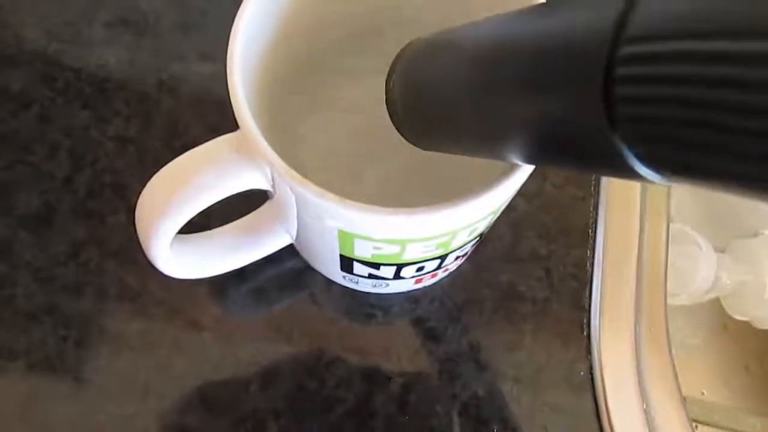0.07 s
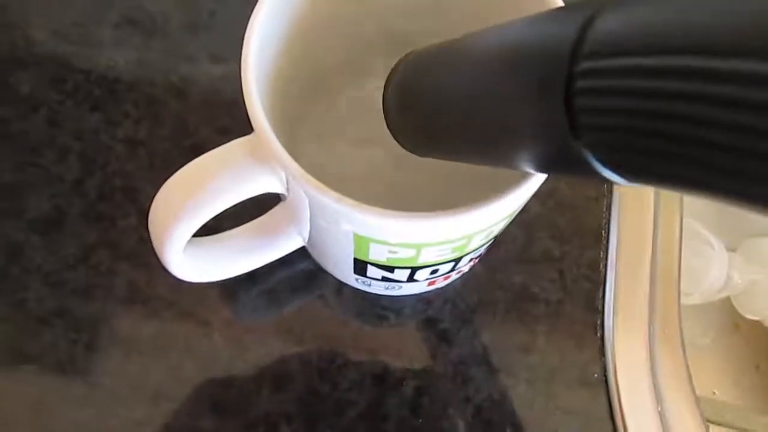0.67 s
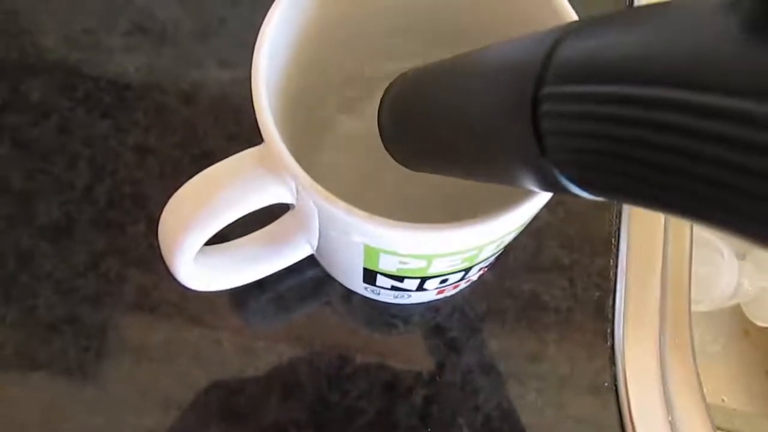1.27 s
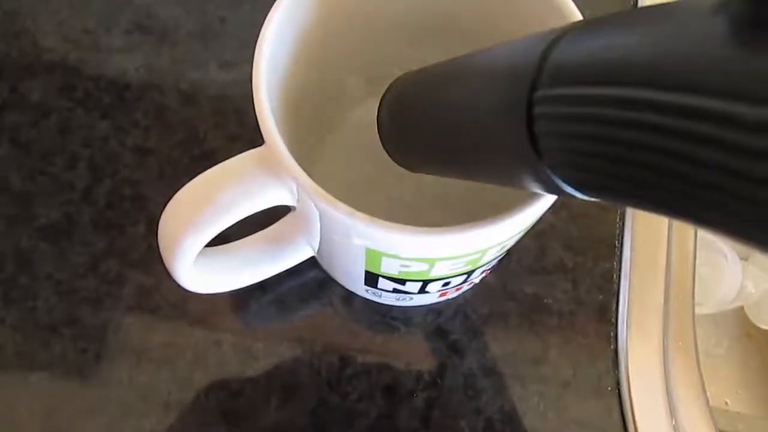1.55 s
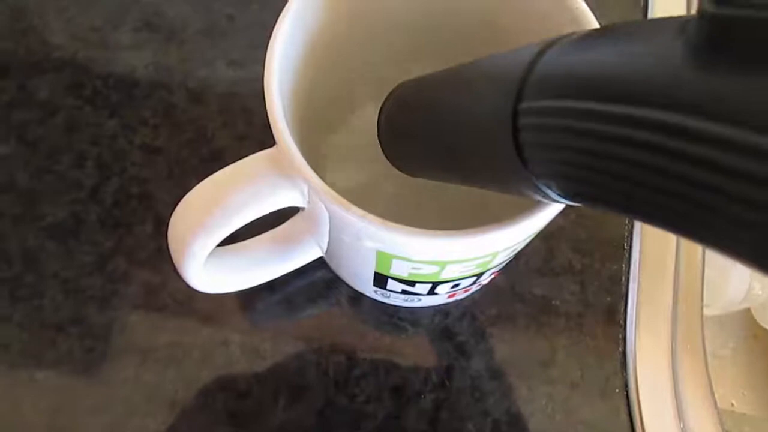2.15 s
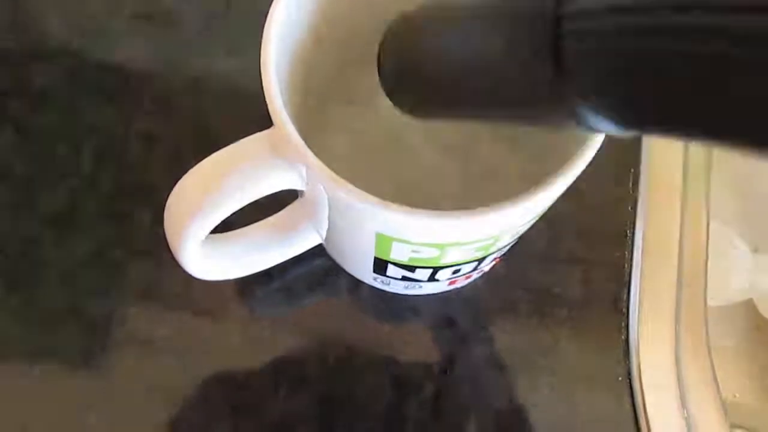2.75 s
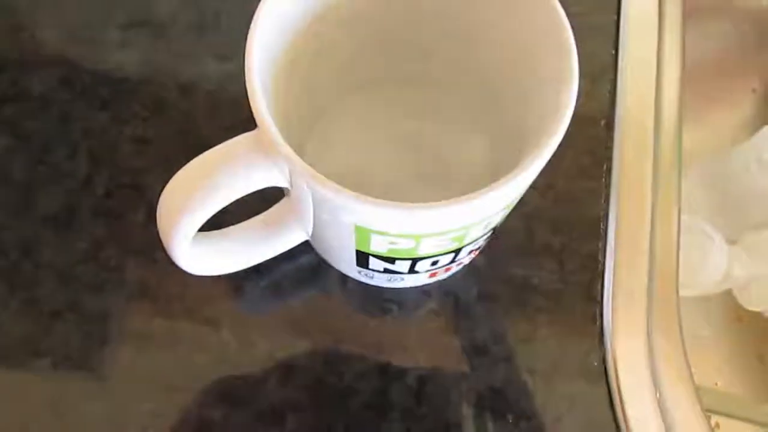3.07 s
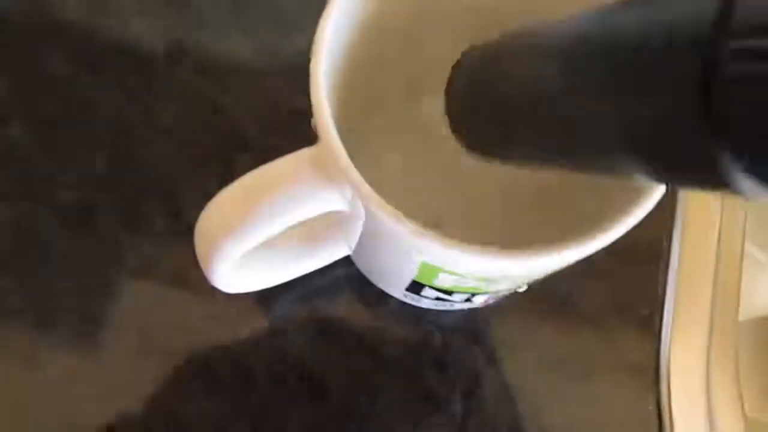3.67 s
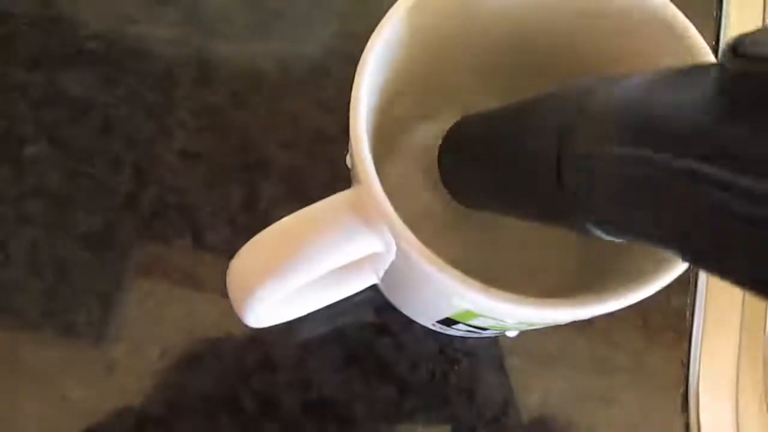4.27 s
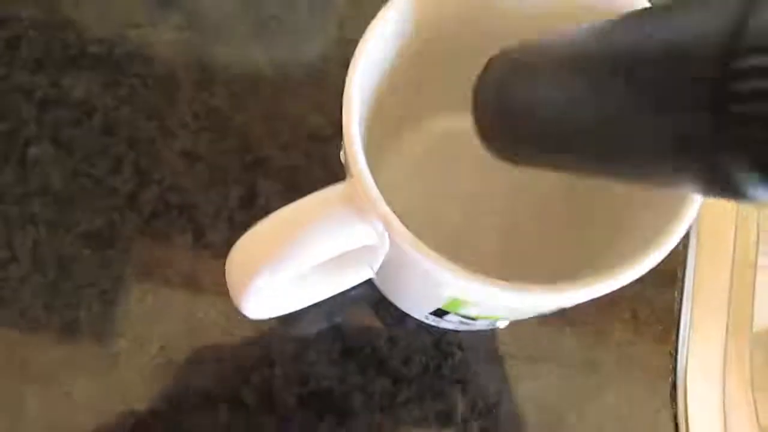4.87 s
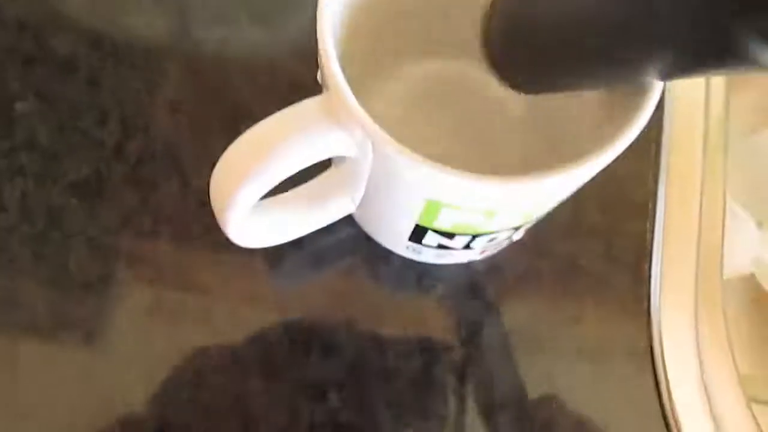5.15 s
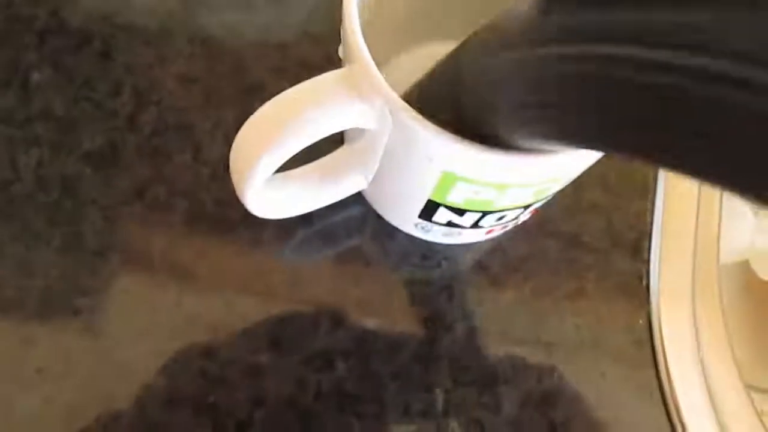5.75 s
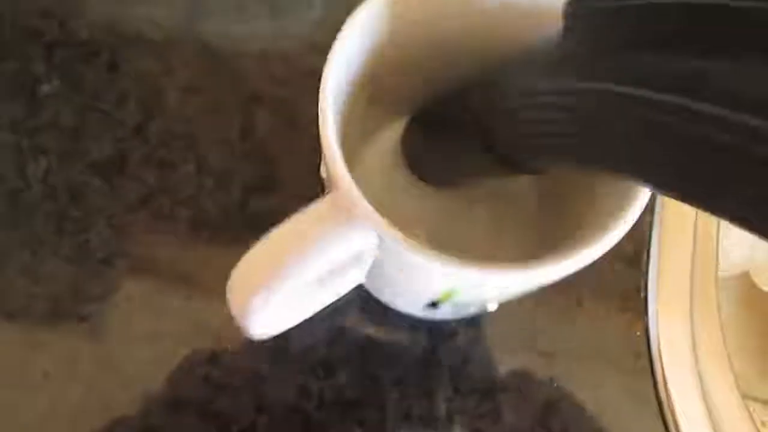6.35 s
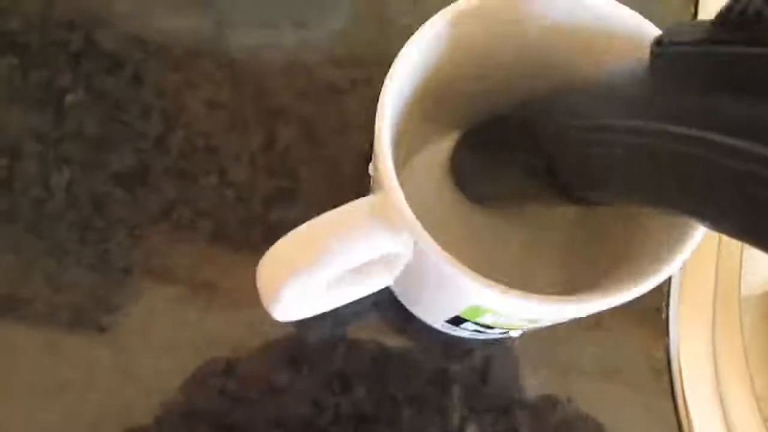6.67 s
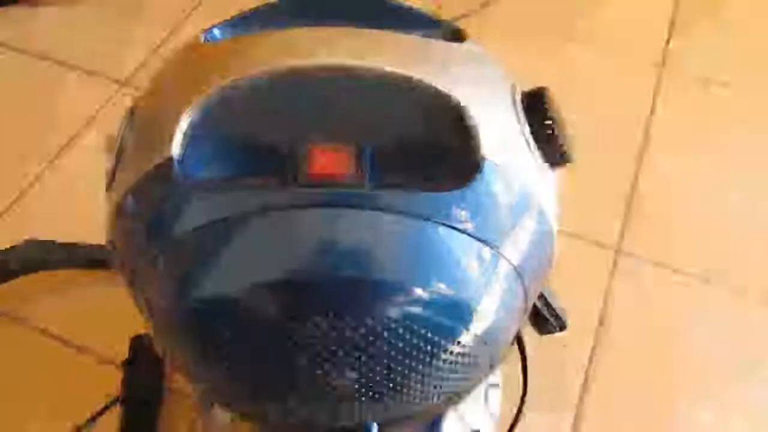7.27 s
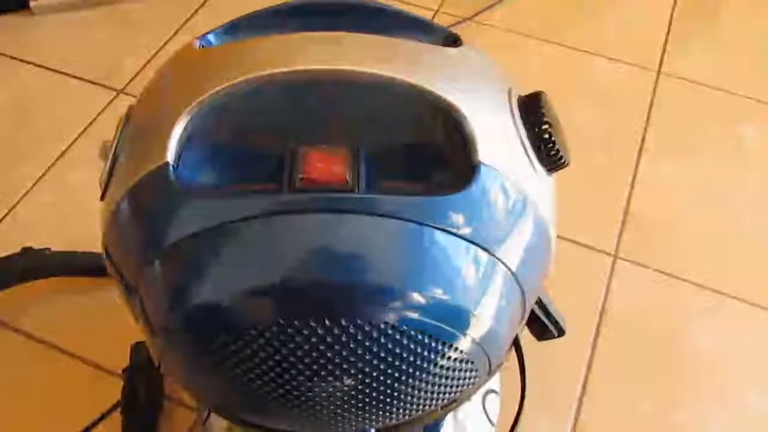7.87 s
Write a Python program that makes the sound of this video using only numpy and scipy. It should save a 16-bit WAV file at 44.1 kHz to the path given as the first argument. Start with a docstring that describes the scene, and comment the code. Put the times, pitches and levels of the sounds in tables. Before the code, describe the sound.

Heard up close in a kitchen, a vacuum nozzle sucks air from a china mug with a bright hiss over an even motor note. A hollow howl sinks in pitch and comes and goes, with brief thin whistles at the rim. The suction grows louder and slurps, then seals: the rush drops and the motor races. With a last spit of air the cleaner cuts off into quiet room tone.

```python
"""Vacuum cleaner in a china mug.

Close up, on a kitchen counter. The rotor gives one clean note; air roars in the hose, hisses at the
moving nozzle, whistles past the rim and blows the mug's air column into a throbbing howl.
Near the end the nozzle chokes and the motor races. The noise stops dead; a quiet room hums on."""
import sys
import numpy as np
from scipy import signal
from scipy.io import wavfile
from scipy.ndimage import uniform_filter1d

SR = 44100
rng = np.random.default_rng(int(sys.argv[2]) if len(sys.argv) > 2 else 0)


def generate_wav(sig):
    """Save sig (samples, or channels by samples) to the path in sys.argv[1] as 16-bit PCM at SR."""
    pcm = np.round(np.clip(np.atleast_2d(sig).T, -1, 1) * 32767).astype(np.int16)
    wavfile.write(sys.argv[1], SR, pcm)


N = 348831
HOP = 256
TIME_S = np.arange(N) / SR
FRAME_S = np.arange(N // HOP + 5) * HOP / SR
BIN_HZ = np.fft.rfftfreq(4 * HOP, 1 / SR)
SLURP_S, CHOKE_S, CHOKE_CLOSE_S, STOP_S = 5.99, 6.8, 0.078, 7.301
MUG_SINK_S = 1.03  # time constant of the mug's falling resonances

# left-right coherence of direct and diffuse sound: f/Hz, coherence/1
DIRECT_COHERENCE = [(60, 1), (340, 1), (1100, 1), (2200, 0.99), (3200, 0.8), (5000, 1), (6400, 0.56),
                    (8000, 0.61), (10500, 1)]
DIFFUSE_COHERENCE = [(60, 1), (340, 1), (1000, 0.91), (1900, 0.061), (3300, 0.1), (10500, 0.11)]
# left channel's phase lead at unit offset: f/Hz, lead/rad
LEFT_LEAD = [(100, 0.25), (5000, -0.16), (6300, -.3), (7500, -0.17), (8500, -0.92), (10500, -0.7)]
# room air spectrum and hum tones: f/Hz, level/dB
ROOM_AIR = [(20, -25.5), (40, -16.5), (90, -9), (140, -4.5), (280, -9), (340, -8), (600, -12), (1100, -9.5),
            (2000, -20), (3400, -24.5), (4400, -29.5), (6200, -24), (8500, -31), (10800, -44)]
ROOM_HUM = [(50, -71), (100, -77), (153, -66), (200, -66), (256, -69), (288, -73), (697, -73), (742, -74),
            (1039, -74), (1137, -72)]
# rush after the stop: f/Hz, level/dB
TAIL_SPECTRUM = [(600, -27), (850, -9), (1130, -2.5), (1600, -9), (2400, -8), (3600, -6), (4400, -28),
                 (4900, -14), (5700, -8), (7500, -19), (10500, -25)]
# modes ringing after the stop: f/Hz, level/dB, t60/s
TAIL_MODES = [(1135, -57, 0.33), (4060, -55, 0.5)]
# uneven low rumble, opposite in left and right: f/Hz, level/dB
ANTIPHASE_SPECTRUM = [(45, -39.5), (90, -9.5), (190, -1.5), (300, 1.5), (430, -3), (600, -11.5), (900, -30)]
# hose roar and rumble: f/Hz, level/dB
ROAR_SPECTRUM = [(100, -53), (200, -22), (260, -19.5), (315, -0.5), (400, -5.2), (470, -5), (560, 2.5),
                 (650, 3), (790, 4.2), (1000, -2), (1300, -4.5), (1650, -7.5), (2200, -28)]
RUMBLE_SPECTRUM = [(15, -50.5), (40, -26.5), (60, -11), (80, 0), (125, 0), (160, -3), (200, 1), (240, -9),
                   (320, 4), (600, -38)]
# air in hose and body: t/s, roar/dB, rumble/dB
HOSE_FLOW = [(0, -38.5, -44), (.8, -37, -43.5), (2.5, -33, -43), (3.0, -35, -42.5), (3.7, -28.8, -39),
             (4.6, -33, -43.5), (5.2, -29.2, -41), (5.5, -31.5, -46.5), (6.75, -29.3, -60)]
# slurping flutter: f/Hz, depth/dB
SLURP_DEPTH = [(200, 4.5), (900, 4), (1900, 6), (2600, 2.5), (4500, 1), (6000, 0)]
# rotor speed: t/s, f/Hz
MOTOR_SPEED = [(0, 525.6), (.5, 528.5), (1.5, 532.3), (2.65, 531.2), (3.1, 528), (4.15, 523.6),
               (4.6, 531.7), (5.1, 530.6), (5.5, 531.2), (6.8, 534), (6.89, 537), (7.0, 543.6), (7.3, 566)]
# motor note: t/s, level/dB, left minus right/dB
MOTOR_NOTE = [(0, -32.5, 4.5), (.5, -35, -13), (.68, -31, -8.5), (1.25, -26, -4.5), (2.65, -25, -4.5),
              (3.08, -31.5, -12), (3.3, -28.5, 4.5), (4.0, -27, 2.5), (4.4, -31, -3), (4.93, -25, -7),
              (5.07, -34, -19), (5.4, -31.5, 2.5), (5.85, -32, -13), (6.735, -33, -4), (6.764, -27.5, -3),
              (6.8, -35, -2), (6.87, -26.5, -2.5), (7.015, -26.5, -4), (7.052, -40, -1.5),
              (7.082, -32, -1.5), (7.115, -38, -2.5), (7.172, -28, -4), (7.215, -34, -1.5),
              (7.28, -29, -2.5)]
# nozzle catches briefly: t/s, rotor speed rise/Hz
CATCHES = [(4.42, 8.4), (5.21, 4.8), (5.7, 7), (6.06, 3), (6.45, 4.6), (6.59, 3)]
# nozzle: t/s, place (0 lifted, 1 in mug, 2 at wall, 3 choked), direct share/1, offset from centre/1
NOZZLE_PATH = [(0, .5, 1, 0.33), (2.6, 1, 0.99, 0.75), (2.7, 3, 0.84, .4), (3.05, -0.5, 0.27, 0.11),
               (3.5, 2.04, .63, .5), (3.95, 0.76, 0.56, 1.4), (4.1, 2.5, 1, 2.4), (4.52, 1.56, 0.98, 2),
               (4.72, 3, 0.7, 1.3), (5.29, 0.24, 0.76, .8), (5.33, 2.5, 1, 1.9), (6.1, 2, 1, 1.2),
               (6.8, 1.85, 0.84, 2.1)]
# hollow dip near 2 kHz: t/s, f/Hz, gain/dB, half width/Hz
HOLLOW_DIP = [(0, 2400, -15, 110), (2.7, 2350, -15, 100), (3.1, 2400, -1.5, 100), (3.4, 2400, -6, 110),
              (3.52, 2390, -19, 140), (3.75, 2320, -16, 190), (4.0, 2320, -11, 170), (4.2, 2170, -7, 160),
              (4.45, 2080, -6, 170), (4.7, 2150, -1, 100), (5.97, 1960, 1.5, 100), (6.04, 1920, -17, 130),
              (6.5, 1880, -17, 170), (6.7, 1780, -15, 220), (6.8, 1600, -22, 280), (6.86, 1620, -10, 220),
              (6.9, 2000, -9, 70)]
# jet blowing across the mug: start/s, end/s, level/dB, time per 6 dB fall outside/s
HOWLS = [(.3, 1.2, -23.4, 0.3), (1.5, 2.72, -22, 0.24), (3.2, 3.38, -27, .05), (3.54, 3.86, -18, .06),
         (3.97, 4.25, -19.8, .16), (5.46, 5.5, -19.5, 0.02), (5.701, 6.66, -26, 0.6)]
# weighting of the howl: f/Hz, gain/dB
HOWL_COLOUR = [(400, -20), (780, -11), (900, 6), (1700, 0.5), (2000, -11), (3000, -25.5)]
# howl modulation: t/s, depth/1
THROB_DEPTH = [(1.3, .15), (1.9, .32), (3.5, .36), (4.4, .42), (4.7, .2)]
# upper mug resonance and bore whistle: t/s, added gain/1
UPPER_MODE = [(0, 0.5), (.6, 1.15), (1.1, .85), (1.6, 1), (2.5, .85), (2.75, 0), (4.25, 0.36), (4.6, 0)]
BORE_WHISTLE = [(0, 0.67), (2.6, 0.34), (2.9, 1.1), (3.6, 0.99), (4.3, .7), (4.9, 1.1), (5.25, .8),
                (5.35, 0)]
# nozzle-rim gap, lower as it opens: t/s, f/Hz, strength/1
RIM_GAP = [(2.56, 6540, 0), (2.67, 6470, 1.15), (2.76, 5900, 0), (2.85, 5540, 0.31), (3.05, 4900, 0.45),
           (3.3, 4870, 0.65), (3.57, 4960, 0.18), (3.71, 5130, 1), (3.84, 5350, 0.5), (3.94, 6400, 0.25),
           (4.15, 6507, .2), (4.5, 6640, 0.24), (4.74, 6400, 0.2), (4.84, 5770, 0.7), (4.92, 5000, 0.42),
           (5.06, 4970, .7), (5.22, 4895, .6), (5.32, 4900, 0.078)]
# gap's spectral ripple at unit strength: f/Hz, depth/dB
GAP_RIPPLE = [(2600, 0), (4000, 4.2), (7000, 3.1), (10500, 1.6)]
# air splitting on the rim: t/s, f/Hz, added gain/1
EDGE_TONES = [(3.51, 5100, .8), (3.6, 3900, .8), (3.71, 5060, .6), (3.72, 8750, .7), (4.84, 5750, .7),
              (4.94, 5050, .6), (5.05, 4890, 2), (5.21, 4890, .7), (5.38, 7600, .6), (5.41, 2250, .7)]
# hiss at each nozzle place: f/Hz, level/dB
HISS_LIFTED = [(760, -37), (1250, -3.5), (1520, 2.5), (1780, 1.5), (2010, -5.5), (2150, -5), (2450, -6),
               (2750, -4.5), (3180, -3.5), (3700, -6.5), (5000, -6.5), (5660, -1.5), (6400, -3),
               (7710, -3.5), (8500, -4.5), (10800, -12.5)]
HISS_IN_MUG = [(760, -27.5), (1300, -4), (1570, 0), (1850, -7), (2000, -8), (2150, -5.5), (2350, -12),
               (2660, -3), (3400, -3), (4400, -5.5), (5500, -5), (6400, -3), (7700, -5.5), (8300, -5),
               (10800, -14)]
HISS_AT_WALL = [(760, -46), (1300, -7.5), (1610, -6.5), (1920, -14), (2100, -6.5), (2330, -5), (2990, -3),
                (3380, -0.5), (4450, -6.5), (4780, -1.5), (5220, -3.5), (5970, -1), (9210, -8),
                (10800, -15)]
HISS_CHOKED = [(760, -48), (1300, -20), (1540, -2.5), (1730, -4), (2000, -15), (2170, -8), (2470, -15),
               (2950, -6), (3400, -8), (4100, -13), (4600, -6.5), (5100, -11.5), (6700, -8.5),
               (9130, -13.5), (10800, -20)]
# nozzle jet: t/s, level/dB, target share of top treble/dB
JET = [(0, -18.5, -5.5), (.7, -16.5, -4.5), (1.1, -18.5, -5), (2.6, -18, -4.7), (3.05, -22, -4),
       (3.55, -16, -5), (3.92, -18, -2.5), (4.2, -14, -10), (4.5, -16.5, -5.5), (4.75, -20, -6),
       (5.3, -18.5, -5), (5.32, -15.8, -4), (5.9, -15, -5), (5.98, -11, 0.2), (6.8, -12, -4)]
# shelf that sets the jet's brightness: f/Hz, weight/1
TREBLE_SHELF = [(5500, 0), (8500, 0.98)]
# nozzle meets the wall or its seal slips: t/s, boost/dB, extra treble/dB
SPITS = [(.19, 1.5, 1.5), (.34, 1.5, 0), (.59, 2.5, 1), (.76, 2.5, 0), (2.32, 2, -1), (4.21, 1.5, 0),
         (5.07, 2, 0), (5.333, 2, 1.5), (5.41, 2, -2), (7.28, 9, 9)]


def gain_of(db):
    """Decibels to amplitude."""
    return 10 ** (np.asarray(db) / 20)


def unit_rms(x):
    """Scale to rms 1."""
    return x / np.sqrt(np.mean(x ** 2) + 1e-20)


def ramp(t, start_s, length_s):
    """Linear rise, 0 to 1."""
    return np.clip((t - start_s) / length_s, 0, 1)


def bump(x, centre, half_width):
    """Gaussian of height 1."""
    return np.exp(-((x - centre) / half_width) ** 2)


def follow(rows, t):
    """Table columns at times t."""
    times_s, *columns = np.transpose(rows)
    return [np.interp(t, times_s, column) for column in columns]


def per_bin(points):
    """Table value per bin, interpolated in log frequency."""
    hz, value = np.transpose(points)
    return np.interp(np.log(BIN_HZ + 1), np.log(hz + 1), value)


def band_gain(shape, band_hz):
    """In-band amplitude per frame."""
    inside = (BIN_HZ >= band_hz[0]) & (BIN_HZ <= band_hz[1])
    return np.sqrt(np.sum(shape ** 2 * inside, -1, keepdims=True) + 1e-20)


def peak(centre_hz, half_hz):
    """Resonance of height 1, steady or moving."""
    return 1 / (1 + ((BIN_HZ - np.reshape(centre_hz, (-1, 1))) / np.reshape(half_hz, (-1, 1))) ** 2)


def waver(t, top_hz):
    """Random drift, rms 1, over the decade below top_hz."""
    rates_hz = np.geomspace(top_hz / 10, top_hz, num=30) * rng.uniform(.9, 1.1, size=30)
    return unit_rms(sum(np.sin(2 * np.pi * (hz * t + rng.random())) for hz in rates_hz))


def patches(white, frames, bins):
    """White noise smoothed into time-frequency patches, rms 1."""
    return unit_rms(uniform_filter1d(uniform_filter1d(white, frames, axis=0), bins, axis=1))


def air_noise(shape, direct, eddy_db, offset=0):
    """Shaped stereo noise stirred by eddies; diffuse sound is less coherent than direct."""
    a, b, c, d, white = rng.standard_normal((5, len(FRAME_S), len(BIN_HZ)))
    eddies = gain_of(eddy_db * patches(white, frames=13, bins=10))
    direct = np.clip(np.reshape(direct, (-1, 1)), 0, 1)
    coherence = direct * per_bin(DIRECT_COHERENCE) + (1 - direct) * per_bin(DIFFUSE_COHERENCE)
    coherence = np.clip(coherence, 0, 1)
    lead_rad = np.reshape(offset, (-1, 1)) * per_bin(LEFT_LEAD)
    left = a + 1j * b
    right = (coherence * left + np.sqrt(1 - coherence ** 2) * (c + 1j * d)) * np.exp(-1j * lead_rad)
    mono_gain = np.sqrt(1 + coherence * np.cos(lead_rad) + 1e-3)
    spectra = np.array([left, right]) * shape * eddies / mono_gain
    return signal.istft(spectra.swapaxes(1, 2), nperseg=4 * HOP, noverlap=3 * HOP)[1][:, :N]


def choked(t):
    """Nozzle seal, 0 open to 1 shut."""
    return ramp(t, CHOKE_S, CHOKE_CLOSE_S)


def nozzle_state(sealed_direct=.08, sealed_offset=4.1):
    """Place, direct share, offset; once sealed, mostly room sound is left."""
    sealed = (3, sealed_direct, sealed_offset)
    blend = ramp(FRAME_S, CHOKE_S + CHOKE_CLOSE_S / 2, CHOKE_CLOSE_S / 2) ** 2
    return [free + (end - free) * blend for free, end in zip(follow(NOZZLE_PATH, FRAME_S), sealed)]


def room(air_db=-59):
    """Kitchen air, mains hum and faint wavering tones, slightly out of phase left to right."""
    air = gain_of(air_db) * unit_rms(air_noise(gain_of(per_bin(ROOM_AIR)), direct=0, eddy_db=1.5))
    channel_turns = np.array([[0], [.13]])
    hum = 0
    for hz, db in ROOM_HUM:
        turns = hz * TIME_S + rng.random() + .1 * waver(TIME_S, top_hz=9)
        hum += gain_of(db) * np.sqrt(2) * np.sin(2 * np.pi * (turns + channel_turns))
    return air + hum


def stop_tail(rush_db=-47, rush_t60_s=.35):
    """A faint rush and two thin, unsteady rings fade after the stop."""
    age_s = np.maximum(TIME_S - STOP_S, 0)
    decay_s = np.maximum(age_s - .055, 0)
    rush = unit_rms(air_noise(gain_of(per_bin(TAIL_SPECTRUM)), direct=0.23, eddy_db=2.5))
    rush *= gain_of(rush_db - 60 * decay_s / rush_t60_s)
    rings = 0
    for hz, db, t60_s in TAIL_MODES:
        turns = hz * age_s + .19 * waver(TIME_S, top_hz=110)
        rings += gain_of(db - 60 * decay_s / t60_s) * np.sin(2 * np.pi * turns)
    return rush * ramp(age_s, 0, length_s=.019) + rings * ramp(age_s, .018, length_s=.021)


def antiphase_rumble(level_db=-41.5):
    """Uneven low rumble, opposite in left and right, from about 6 to 6.8 s."""
    rumble = unit_rms(air_noise(gain_of(per_bin(ANTIPHASE_SPECTRUM)), direct=1, eddy_db=5.5)[0])
    level = gain_of(level_db) * ramp(TIME_S, SLURP_S, length_s=.25) * (1 - choked(TIME_S))
    return np.array([rumble, -rumble]) * level


def slurp():
    """Gain per frame and bin: against the mug's bottom, air comes in uneven gulps."""
    gulps = patches(rng.standard_normal((len(FRAME_S), len(BIN_HZ))), frames=7, bins=5)
    sucking = ramp(FRAME_S, SLURP_S, length_s=.03) * (1 - choked(FRAME_S))
    gain = gain_of(sucking[:, None] * per_bin(SLURP_DEPTH) * np.tanh(gulps))
    return gain / np.sqrt(uniform_filter1d(gain ** 2, size=60, axis=0))


def hose_roar(gulps, choke_db=-11):
    """Air rushing through hose and body: roar over a low rumble."""
    roar_db, rumble_db = follow(HOSE_FLOW, FRAME_S)
    roar_db += choke_db * choked(FRAME_S)
    roar, rumble = gain_of(per_bin(ROAR_SPECTRUM)), gain_of(per_bin(RUMBLE_SPECTRUM))
    roar = gain_of(roar_db)[:, None] * roar / band_gain(roar, band_hz=(600, 830))
    rumble = gain_of(rumble_db)[:, None] * rumble / band_gain(rumble, band_hz=(50, 230))
    return air_noise(gulps * np.hypot(roar, rumble), direct=0.42, eddy_db=2.0)


def motor(catch_half_s=0.059, catch_db=-5.5):
    """One rotor tone, racing when starved of air; standing waves shift it left and right."""
    hz, = follow(MOTOR_SPEED, TIME_S)
    level_db, side_db = follow(MOTOR_NOTE, TIME_S)
    for at_s, rise_hz in CATCHES:
        catch = bump(TIME_S, at_s, catch_half_s)
        hz += rise_hz * catch
        level_db += catch_db * catch
    # less steady once the nozzle moves about
    waver_db = .62 + .88 * ramp(TIME_S, 2.2, length_s=3.6)
    waver_hz = .49 + 1.71 * ramp(TIME_S, 5.2, length_s=.4) * (1 - choked(TIME_S))
    turns = np.cumsum(hz + waver_hz * waver(TIME_S, top_hz=14)) / SR
    pan = gain_of([side_db / 2, -side_db / 2])
    level = gain_of(level_db + waver_db * waver(TIME_S, top_hz=16))
    return pan / pan.mean(0) * level * np.sqrt(2) * np.sin(2 * np.pi * turns)


def hollow_dip(waver_hz=42, waver_db=5):
    """Hollow, wavering dip in hiss and howl near 2 kHz, sinking over time."""
    centre_hz, dip_db, half_hz = follow(HOLLOW_DIP, FRAME_S)
    centre_hz += waver_hz * waver(FRAME_S, top_hz=5)
    dip_db = np.minimum(dip_db + waver_db * waver(FRAME_S, top_hz=7), 0)
    return gain_of(dip_db[:, None] * bump(BIN_HZ, centre_hz[:, None], half_hz[:, None]))


def throb(howl, rate_hz=27, stray=.38):
    """The mug's air column fills and spills in loosely timed pulses of like size."""
    power = (howl ** 2).mean(0)
    short_power, long_power = (abs(uniform_filter1d(power, size)) + 1e-20 for size in (900, 9000))
    levelled = howl / (short_power / long_power) ** .22
    turns = np.cumsum(rate_hz * (1 + stray * waver(TIME_S, top_hz=18))) / SR
    depth, = follow(THROB_DEPTH, TIME_S)
    return levelled * (1 + depth * np.sin(2 * np.pi * turns)) / np.sqrt(1 + depth ** 2 / 2)


def mug_howl(gulps, floor_db=-32, choked_db=-39, choked_hz=1470):
    """Turbulence blows the mug's air column: sharper as its pitch sinks, damped by the wall."""
    free_hz = 915 + 680 * np.exp(-FRAME_S / MUG_SINK_S)
    centre_hz = free_hz + (choked_hz - free_hz) * ramp(FRAME_S, CHOKE_S + CHOKE_CLOSE_S, length_s=0.14)
    howls_db = [db - 6 * abs(FRAME_S - np.clip(FRAME_S, start_s, end_s)) / fall_s
                for start_s, end_s, db, fall_s in HOWLS]
    sealed = choked(FRAME_S)
    level_db = (1 - sealed) * np.maximum(np.max(howls_db, 0), floor_db) + sealed * choked_db
    place, direct, _ = nozzle_state()
    damping = 1 + 0.65 * np.maximum(place - 1, 0)
    shape = peak(centre_hz, half_hz=112 * damping * (centre_hz / 1000) ** 3.5)
    shape *= hollow_dip() * gain_of(per_bin(HOWL_COLOUR))
    howl = air_noise(gulps * shape / band_gain(shape, band_hz=(850, 1400)), direct, eddy_db=0.65)
    return np.interp(TIME_S, FRAME_S, gain_of(level_db)) * throb(howl)


def mug_upper_mode():
    """The mug's upper resonance sinks as the nozzle slides in."""
    strength, = follow(UPPER_MODE, FRAME_S)
    centre_hz = 2570 + 700 * np.exp(-FRAME_S / MUG_SINK_S)
    return 1 + strength[:, None] * peak(centre_hz, half_hz=170)


def rim_gap(direct):
    """The gap rings on odd quarter waves; echoes off mug, counter and hand lag more as it opens."""
    gap_hz, strength = follow(RIM_GAP, FRAME_S)
    quarter_waves = -np.cos(3 * np.pi * BIN_HZ / gap_hz[:, None])
    ripple_db = strength[:, None] * quarter_waves * per_bin(GAP_RIPPLE)
    whistle = 1 + 0.25 * strength[:, None] * peak(gap_hz, half_hz=160)
    echo_gain = np.interp(direct, [.6, 1], [.2, .07])[:, None]
    echoes = 0
    for base_s in (.0008, .0017, .0029, .0047):
        delay_s = base_s * np.sqrt(gap_hz[0] / gap_hz) + .00003 * waver(FRAME_S, top_hz=1.5)
        echoes += np.exp(-2j * np.pi * BIN_HZ * delay_s[:, None])
    return gain_of(ripple_db) * whistle * abs(1 + echo_gain * echoes)


def bore_whistle():
    """Air rings a narrow cross resonance of the nozzle's bore."""
    strength, = follow(BORE_WHISTLE, FRAME_S)
    return 1 + strength[:, None] * peak(centre_hz=6340, half_hz=42)


def edge_tones(half_s=.055):
    """Air splitting on the rim sings briefly in narrow bands."""
    return 1 + sum(strength * bump(FRAME_S, at_s, half_s)[:, None] * peak(hz, half_hz=58)
                   for at_s, hz, strength in EDGE_TONES)


def nozzle_hiss(gulps, choke_db=-17.2, spit_half_s=0.017, hiss_hz=(2500, 10800), top_hz=(7500, 10800)):
    """Jet noise, coloured by the nozzle's place and the resonances of mug, gap and bore."""
    hiss_db, top_db = follow(JET, FRAME_S)
    hiss_db += choke_db * choked(FRAME_S) ** 2
    for at_s, boost_db, treble_db in SPITS:
        spit = bump(FRAME_S, at_s, spit_half_s)
        hiss_db += boost_db * spit
        top_db += treble_db * spit
    place, direct, offset = nozzle_state()
    colours = [HISS_LIFTED, HISS_IN_MUG, HISS_AT_WALL, HISS_CHOKED]
    place = np.clip(place, 0, len(colours) - 1)
    colour_db = sum(np.maximum(1 - abs(place[:, None] - k), 0) * per_bin(colour)
                    for k, colour in enumerate(colours))
    shape = gain_of(colour_db) * mug_upper_mode() * rim_gap(direct)
    shape *= bore_whistle() * edge_tones() * hollow_dip()
    # top treble share follows its own curve
    share_db = 20 * np.log10(band_gain(shape, top_hz) / band_gain(shape, hiss_hz))
    shape *= gain_of((top_db[:, None] - share_db) * per_bin(TREBLE_SHELF))
    shape /= band_gain(shape, hiss_hz)
    flutter_db = np.interp(place, [1, 2], [.7, .35])  # the wall steadies the jet
    level = gain_of(hiss_db + flutter_db * waver(FRAME_S, top_hz=28))
    eddy_db = np.interp(direct, [.5, .9], [2.2, 1.45])[:, None]
    return air_noise(gulps * level[:, None] * shape, direct, eddy_db, offset)


def scene(cutoff_s=0.004):
    """The cleaner's sound runs, then breaks off at once; the room stays."""
    running = np.clip((STOP_S - TIME_S) / cutoff_s + .5, 0, 1)
    gulps = slurp()
    cleaner = nozzle_hiss(gulps) + mug_howl(gulps) + hose_roar(gulps) + antiphase_rumble() + motor()
    return running * cleaner + stop_tail() + room()


def record(dry, low_cut_hz=44, notch_hz=7890, notch_width_hz=210, high_cut_hz=10900):
    """Microphone: low cut, narrow treble notch, band limit."""
    thinned = signal.lfilter(*signal.butter(2, low_cut_hz, "highpass", fs=SR), dry)
    notched = signal.lfilter(*signal.iirnotch(notch_hz, notch_hz / notch_width_hz, fs=SR), thinned)
    lowpass = signal.firwin(1023, high_cut_hz, window=("kaiser", 9), fs=SR)
    return signal.oaconvolve(notched, lowpass[None], "same")


dry = scene()
out = record(dry)
generate_wav(out)
```